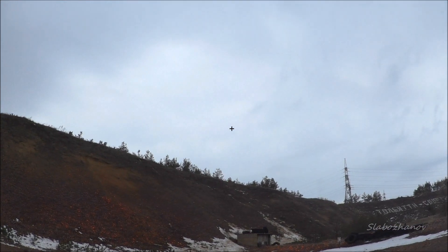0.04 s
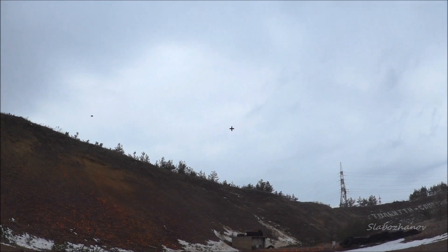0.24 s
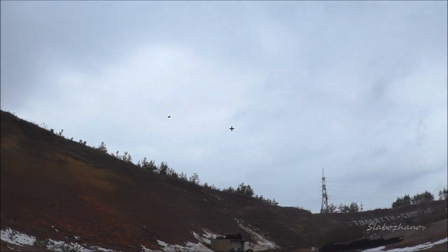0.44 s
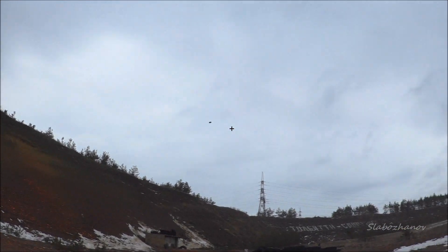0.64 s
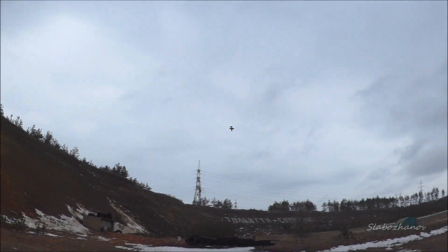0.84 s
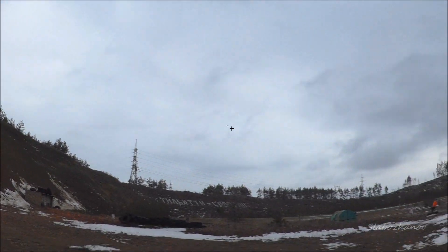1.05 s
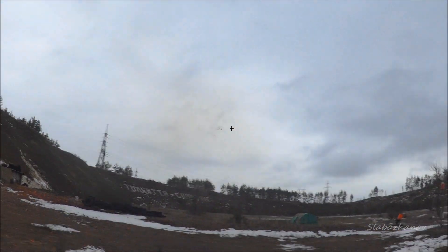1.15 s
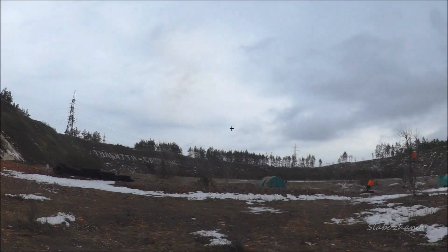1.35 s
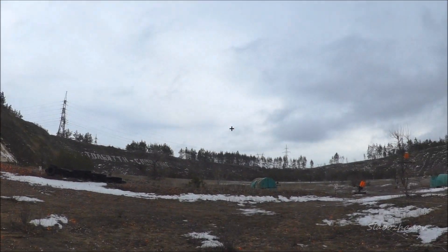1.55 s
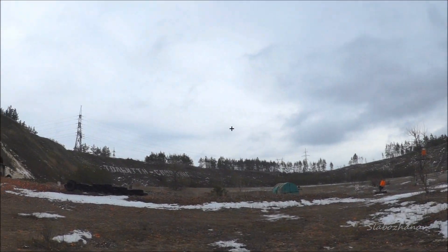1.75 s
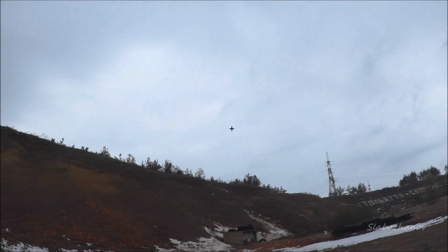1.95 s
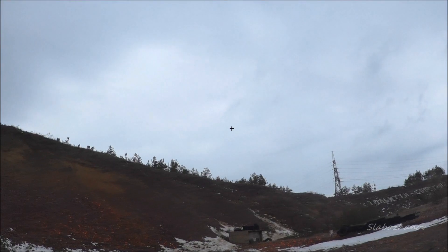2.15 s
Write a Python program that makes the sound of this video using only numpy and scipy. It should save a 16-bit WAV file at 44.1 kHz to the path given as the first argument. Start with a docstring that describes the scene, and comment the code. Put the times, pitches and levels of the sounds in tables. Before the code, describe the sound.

Low gusting wind and case knocks, then a sharp neighbouring gunshot with short rolling echoes; a third of a second later the close shotgun fires, dry and ringing, followed by action clacks, bumps and a sudden stop.

```python
"""A shotgun fires in an open field at clay shooting, heard by a small cased microphone fixed to the gun.
The blast is shaped noise with a bright case rattle; the barrel rings as decaying sines and the action clacks.
Earlier a nearby shot cracks as a pressure pulse and rolls round the slopes as scattered echoes.
Knocks and soft gust puffs excite the case's resonances, and wind noise buffets the case as the gun swings.
Air hiss, rustle and rubs lie beneath; the sound stops dead."""
import sys
import numpy as np
from scipy import signal
from scipy.fft import rfft, irfft
from scipy.io import wavfile
from scipy.ndimage import uniform_filter1d

SR = 44100
rng = np.random.default_rng(int(sys.argv[2]) if len(sys.argv) > 2 else 0)


def master_out(mix):
    """Clip the mix to full scale and print it as 16-bit PCM to the path in sys.argv[1]."""
    frames = np.transpose(np.atleast_2d(mix))
    ceiling = np.clip(frames, -1, 1)
    pcm = np.round(ceiling * 32767).astype(np.int16)
    wavfile.write(sys.argv[1], SR, pcm)


N = 97020
T = np.arange(N) / SR
ATTACK_S = 0.00051  # shared by the sharp sounds

SHOT_S, SHOT_DB, SHOT_HOLD_S, SHOT_T60_S = 1.231, -14.5, 0.02, 0.064
RATTLE_DB, RATTLE_HOLD_S, RATTLE_T60_S = -23, 0.009, 0.06
RATTLE_HITS_PER_S, RATTLE_SPREAD_DB = 11000, 4.5
BLAST_EVEN_S = 0.011
# Tone of the muzzle blast: f/Hz, relative level/dB
BLAST_SPECTRUM = [(60, -11.5), (200, -0.5), (500, 3.5), (900, -5.5), (1900, -7), (2600, -21), (3500, -24),
                  (4100, -54.5), (6000, -49.5)]
# Tone of the rattling case: f/Hz, relative level/dB
RATTLE_SPECTRUM = [(3800, -29), (5800, -25), (6500, -13.5), (7100, -2.5), (7900, -15), (9300, -5),
                   (11000, -21), (12500, -14), (13800, -3), (15500, 1), (16500, -28)]


def own_shot():
    """The blast shakes the case, which rattles as dense bright impacts; the barrel rings on."""
    blast = evened(coloured(BLAST_SPECTRUM), BLAST_EVEN_S)
    blast = from_db(SHOT_DB) * blast * burst(SHOT_S, ATTACK_S, SHOT_HOLD_S, SHOT_T60_S)
    rattle = coloured(RATTLE_SPECTRUM, grains(RATTLE_HITS_PER_S, RATTLE_SPREAD_DB))
    rattle = from_db(RATTLE_DB) * rattle * burst(SHOT_S, ATTACK_S, RATTLE_HOLD_S, RATTLE_T60_S)
    return blast + rattle + barrel()


BARREL_DB, BARREL_DELAY_S = -18, .012
# Limit of the starting sharpness for low modes (share of pitch), and its settling time constant
BARREL_SAG, BARREL_SETTLE_S = 0.09, 0.05
SAG_HALF_HZ = 1300  # a mode this high sags half as much
# Ringing modes of the barrel: settled f/Hz, relative level/dB, t60/s
BARREL_MODES = [(105, 0.5, 0.76), (210, 2.5, 0.14), (358, 5, .17), (462, 3, .08), (585, -1, 0.1),
                (765, -13, 0.14), (3500, -31, 0.13), (3735, -32, 0.27)]


def barrel():
    """The barrel's modes start a little sharp, the low ones most, and settle as they die away."""
    start = SHOT_S + BARREL_DELAY_S
    age = np.maximum(T - start, 0)
    # Extra phase time that the initial sharpness adds up to
    lead = BARREL_SAG * BARREL_SETTLE_S * (1 - np.exp(-age / BARREL_SETTLE_S))
    out = np.zeros(N)
    for hz, db, t60 in BARREL_MODES:
        phase_time = age + lead / (1 + hz / SAG_HALF_HZ)
        mode = np.sin(2 * np.pi * hz * phase_time)
        out += from_db(BARREL_DB + db) * mode * burst(start, ATTACK_S, 0, t60)
    return out


CLACK_HOLD_S, CLACK_T60_S = 0.0034, 0.032
# Steel parts of the action striking: t/s, level/dB
ACTION_CLACKS = [(1.2365, -18.5), (1.2695, -34), (1.3462, -29.5)]
# Tone of the steel: f/Hz, relative level/dB
CLACK_SPECTRUM = [(500, -2), (1150, 11.5), (1900, -0.5), (2400, 6.5), (3500, -4), (4200, -32.5),
                  (5700, -27), (7000, -5), (8500, -18), (12000, -29.5), (15000, -25)]


def action():
    """Short steely noise bursts as the gun's parts hit their stops."""
    hits = sum(from_db(db) * burst(s, ATTACK_S, CLACK_HOLD_S, CLACK_T60_S) for s, db in ACTION_CLACKS)
    return coloured(CLACK_SPECTRUM) * hits


# REPORT_DB is the pulse level before its edge is softened
REPORT_S, REPORT_DB, REPORT_PULSE_S, REPORT_EDGE_HZ = .8760, 2.7, .0007, 1450
BOUNCE_S, BOUNCE_DB = 0.001584, -16  # delay and level relative to the direct pulse
SNAP_DB, SNAP_T60_S = -52, .025
EARLY_DB, EARLY_T60_S = -13, .04
ROLL_DB, ROLL_RISE_S, ROLL_T60_S = -28.3, 0.034, 0.8
FLEX_TOP_HZ, ECHOES_PER_S, ECHO_SPREAD_DB = 2700, 2500, 3
# Flexing modes of the case, before the top is softened: f/Hz, level/dB, t60/s
FLEX_MODES = [(165.7, 1.5, 0.022), (840, -14, 0.018), (2500, -25.5, 0.02)]
# Tone of the echoes off ground and slopes: f/Hz, relative level/dB
ROLL_SPECTRUM = [(80, -5.5), (250, 4), (500, -1), (900, -4), (1500, -16), (2700, -25), (3400, -38),
                 (4200, -62), (6000, -52.5), (7000, -38.5), (8500, -46)]


def nearby_shot():
    """A blast pulse and ground bounce; the case flexes as the bounce lands; ground and slopes echo."""
    age = np.maximum(T - REPORT_S, 0) / REPORT_PULSE_S
    # Pressure jump that decays through zero into suction
    pulse = (T > REPORT_S) * (1 - age) * np.exp(-age)
    pulse = pulse + from_db(BOUNCE_DB) * np.interp(T - BOUNCE_S, T, pulse)
    crack = from_db(REPORT_DB) * low_pass(pulse, REPORT_EDGE_HZ, order=6)

    bounce_hit = click(REPORT_S + BOUNCE_S)
    flex = sum(from_db(db) * ring(bounce_hit, hz, t60) for hz, db, t60 in FLEX_MODES)
    flex = low_pass(flex, FLEX_TOP_HZ, order=8)

    scatter = from_db(EARLY_DB) * burst(REPORT_S, ATTACK_S, 0, EARLY_T60_S)
    roll = from_db(ROLL_DB) * burst(REPORT_S, ROLL_RISE_S, ROLL_RISE_S, ROLL_T60_S)
    echoes = coloured(ROLL_SPECTRUM, grains(ECHOES_PER_S, ECHO_SPREAD_DB))
    snap = from_db(SNAP_DB) * rng.standard_normal(N) * burst(REPORT_S, ATTACK_S, 0, SNAP_T60_S)
    return (scatter + roll) * echoes + flex - crack + snap


# Upper edges of the thud, body and clack mode groups; ticks lie above
THUD_TOP_HZ, BODY_TOP_HZ, CLACK_TOP_HZ = 250, 700, 5047
# Knocks and soft gust puffs on the case, drive per mode group:
# t/s, thud level/dB, body level/dB, clack level/dB, tick level/dB, top of the clack drive f/Hz
KNOCKS_AND_PUFFS = [(.056, -23, -21, -32.5, -58.5, 2500), (.189, -7, -6, -28, -74, 1110),
                    (.279, -11, -14, -23.5, -81.5, 948), (.449, -16, -17, -32, -81, 900),
                    (.982, -13, -19, -28.5, -54, 2500), (1.125, -12.5, -21, -21.5, -56, 2200),
                    (1.16, -19.5, -18, -17, -61, 1240), (1.378, -22, -23, -29, -62.5, 2020),
                    (1.49, -24, -24, -39, -78, 900), (1.524, -22, -20, -31, -74.5, 1036),
                    (1.645, -14, -17, -26, -77, 1114), (1.656, -18, -18, -27.5, -74, 955),
                    (1.714, -25, -28, -22, -66, 1200), (1.774, -22, -22, -31, -54.5, 2500),
                    (1.84, -12.5, -6.5, -12, -47.5, 2000)]
# Light contacts that drive only the tick modes: t/s, drive level/dB
LIGHT_TICKS = [(.503, -60), (.542, -52), (.64, -58), (.673, -54), (1.08, -56)]
# Ringing modes of the case: f/Hz, level relative to the drive/dB, t60/s
CASE_MODES = [(134, -1, 0.044), (331.7, -2.5, 0.024), (537, -6, 0.02), (780, -7, .016), (1150, -7, 0.013),
              (1350, -6.5, 0.02), (1950, -9, 0.012), (2500, -17, 0.022), (3200, -18, 0.017),
              (7050, 0, .008), (8900, -1, .004)]


def knocks_and_puffs():
    """Knocks and soft gust puffs ring the case's modes, from thud to tick; the lightest only tick."""
    drives = np.zeros((4, N))
    for s, thud_db, body_db, clack_db, tick_db, top_hz in KNOCKS_AND_PUFFS:
        push = impact(s)
        drives[0] += from_db(thud_db) * push
        drives[1] += from_db(body_db) * push
        drives[2] += from_db(clack_db) * low_pass(push, top_hz, order=4)
        drives[3] += from_db(tick_db) * push
    drives[3] += sum(from_db(db) * impact(s) for s, db in LIGHT_TICKS)

    groups = np.zeros((4, N))
    for k, (hz, db, t60) in enumerate(CASE_MODES):
        group = np.searchsorted([THUD_TOP_HZ, BODY_TOP_HZ, CLACK_TOP_HZ], hz)
        polarity = (-1) ** k
        groups[group] += polarity * from_db(db) * ring(drives[group], hz, t60)
    thud, body, clack, tick = groups
    return low_pass(thud + body, BODY_TOP_HZ, order=2) + clack + tick


CHATTER_DB, CHATTER_T60_S = -0.5, .05  # chatter energy relative to the first click


def impact(s):
    """One click and the decaying noise chatter that follows it."""
    chatter = rng.standard_normal(N) * burst(s, ATTACK_S, 0, CHATTER_T60_S)
    return click(s) + from_db(CHATTER_DB) * chatter / np.linalg.norm(chatter) + 1e-18


GUST_TEAR, GUST_TEAR_DB = 1.675, -7  # tear grows as this power of the wind gain
BUFFET_LIMIT, BUFFET_TOP_HZ = 0.87, 1280  # limit is an amplitude
EVEN_S, LUMP_DB, LUMPS_PER_S = 0.022, 1.5, 22
# Level of the wind noise as heard, before limiting; it sinks after the gun fires: t/s, level/dB
WIND_LEVEL = [(0, -26.5), (.148, -28), (.175, -8), (.205, -6.5), (.24, -15), (.265, -13), (.36, -18),
              (.46, -17.5), (.53, -28), (.56, -17), (.61, -24), (.8, -37), (.86, -37), (.91, -18.5),
              (.99, -28.5), (1.172, -32), (1.19, -14), (1.22, -11), (1.255, -17), (1.275, -50), (1.47, -32),
              (1.535, -26), (1.56, -35.5), (1.62, -29.5), (1.655, -20), (1.72, -37), (1.76, -23.5),
              (1.865, -23), (1.885, -13), (1.93, -18)]
# Tone of the low buffeting: f/Hz, relative level per Hz/dB
BUFFET_SPECTRUM = [(20, -8), (45, -2), (90, 3.5), (170, -0.5), (260, -5), (400, -19.5), (650, -32.5),
                   (1000, -44.5), (1600, -52)]
# Tone of the brighter tearing: f/Hz, relative level/dB
TEAR_SPECTRUM = [(150, -10), (260, 2), (480, -5), (750, -19.5), (1200, -35)]


def wind():
    """Lumpy buffeting follows the wind level and saturates at its strongest, which tears more brightly."""
    lumps = from_db(LUMP_DB * coloured([(LUMPS_PER_S / 2, 0), (LUMPS_PER_S, 0)]))
    wind_gain = level(WIND_LEVEL)
    buffet = wind_gain * evened(coloured(BUFFET_SPECTRUM), EVEN_S)
    tear = from_db(GUST_TEAR_DB) * wind_gain ** GUST_TEAR * evened(coloured(TEAR_SPECTRUM), EVEN_S)
    limited = BUFFET_LIMIT * np.tanh(lumps * (buffet + tear) / BUFFET_LIMIT)
    return low_pass(limited, BUFFET_TOP_HZ, order=4)


# Jolts of pressure on the microphone: t/s, peak level/dB, width/s
PRESSURE_JOLTS = [(.1838, 1, .0012), (1.2153, -4, .0015), (1.8825, -4, .0024)]


def jolts():
    """Single hard pushes on the case as gusts build: a negative peak with a positive lobe each side."""
    out = np.zeros(N)
    for s, db, width_s in PRESSURE_JOLTS:
        u = (T - s) / width_s
        out -= from_db(db) * (1 - u * u) * np.exp(-u * u / 2)
    return out


RUB_HZ, RUB_T60_S, RUB_WIDTH_S = 1250, .006, .014
# Soft rubs on the case: t/s, level at the top of the swell/dB
CASE_RUBS = [(.665, -51), (.722, -52), (.77, -54), (.845, -50)]


def rubs():
    """Soft rubs swell and fade as noise in one middle resonance of the case."""
    swells = sum(from_db(db) * np.exp(-((T - s) / RUB_WIDTH_S) ** 2) for s, db in CASE_RUBS)
    resonance = ring(rng.standard_normal(N), RUB_HZ, RUB_T60_S)
    return swells * coloured([(RUB_HZ, 0)], resonance)


TICKS_PER_S, TICK_SPREAD_DB = 450, 1.5
# Fine ticking of the mount over time: t/s, level/dB
MOUNT_LEVEL = [(0, -69), (.25, -90), (.6, -68), (.8, -75), (.9, -71), (1.15, -70), (1.6, -87), (1.8, -74),
               (1.93, -73)]
# Tone of the ticking: f/Hz, relative level/dB
MOUNT_SPECTRUM = [(5500, -25), (7000, 3.5), (7800, -4), (9300, -3), (11000, -10), (15000, -3)]


def rustle():
    """Dense tiny ticks as the mount shifts, made from shaped random impulses."""
    return level(MOUNT_LEVEL) * coloured(MOUNT_SPECTRUM, grains(TICKS_PER_S, TICK_SPREAD_DB))


SCUFFS_PER_S, SCUFF_SPREAD_DB, SCUFF_DB = 500, 4.7, -2.5  # SCUFF_DB is relative to the smooth hiss
# Hiss of the open field over time: t/s, level/dB
FIELD_LEVEL = [(0, -52), (.15, -52.5), (.35, -58), (.55, -54), (.8, -55), (1.15, -45.5), (1.29, -51.5),
               (1.4, -49), (1.58, -56), (1.72, -57), (1.8, -47), (1.93, -43)]
# Tone of the field hiss: f/Hz, relative level/dB
FIELD_SPECTRUM = [(200, 0), (350, 7), (600, 7), (1250, 6), (1900, -5), (2800, -10), (3400, -20),
                  (4100, -40), (5900, -38.5), (7000, -27), (12000, -42)]


def air():
    """The noise hiss of the field, roughened by small scuffs on the case."""
    scuffs = coloured(FIELD_SPECTRUM, grains(SCUFFS_PER_S, SCUFF_SPREAD_DB))
    return level(FIELD_LEVEL) * rms_one(coloured(FIELD_SPECTRUM) + from_db(SCUFF_DB) * scuffs)


# Thin high hiss over time: t/s, level/dB
THIN_HISS_LEVEL = [(1.23, -72), (1.3, -90), (1.7, -88), (1.9, -72)]
# Tone of the thin hiss: f/Hz, relative level per Hz/dB
THIN_HISS_SPECTRUM = [(12500, -25), (15200, 0), (16500, -15)]


def hiss():
    """A thin, very high noise drops away after the gun fires and returns near the end."""
    return level(THIN_HISS_LEVEL) * coloured(THIN_HISS_SPECTRUM)


def from_db(db):
    """Decibels to gain."""
    return 10 ** (np.asarray(db) / 20)


def rms_one(x):
    """Scale to unit power."""
    return x / np.sqrt(np.mean(x ** 2) + 1e-20)


def level(rows):
    """Gain along a curve of t/s, level/dB."""
    return from_db(np.interp(T, *np.transpose(rows)))


def coloured(spectrum, source=None):
    """Shape white noise, or a given source, to a spectrum of f/Hz, level/dB; rms 1."""
    if source is None:
        source = rng.standard_normal(N)
    hz, db = np.transpose(spectrum)
    log_f = np.log(np.maximum(np.arange(N // 2 + 1) * SR / N, 1))
    # Beyond the end points the gain falls by 12 dB per octave
    outside = np.maximum(np.log(hz[0]) - log_f, 0) + np.maximum(log_f - np.log(hz[-1]), 0)
    gain = from_db(np.interp(log_f, np.log(hz), db)) * np.exp(-2 * outside)
    return rms_one(irfft(rfft(source) * gain, N))


def evened(x, span_s):
    """Take the slow chance swings out of a noise by dividing by its local rms."""
    size = max(int(span_s * SR), 2)
    power = uniform_filter1d(uniform_filter1d(x * x, size), size)
    return x / np.sqrt(power + 1e-9)


def burst(start, attack, hold, t60):
    """Envelope: linear attack and exponential release; hold counts from the start."""
    age = T - start
    release = from_db(-60 * np.maximum(age - hold, 0) / t60)
    return np.clip(age / attack, 0, 1) * release


def click(s):
    """A unit impulse at time s."""
    return 1. * (np.arange(N) == int(s * SR))


def ring(drive, hz, t60):
    """A decaying resonance: a unit click sets a sine of starting height 1 ringing."""
    r = from_db(-60 / (t60 * SR))  # decay per sample
    w = 2 * np.pi * hz / SR
    return signal.lfilter([0, np.sin(w)], [1, -2 * r * np.cos(w), r * r], drive + 1e-18)


def grains(per_s, spread_db):
    """Random tiny impacts of uneven size and either polarity."""
    sizes = from_db(spread_db * np.minimum(rng.exponential(1, N), 5)) * rng.choice([-1, 1], N)
    return sizes * (rng.random(N) < per_s / SR)


def low_pass(x, hz, order):
    """Soften the treble."""
    return signal.sosfilt(signal.butter(order, hz, fs=SR, output="sos"), x)


BALANCE_DB = 0.14  # first channel over second


def scene():
    """One microphone feeds both channels at slightly different levels."""
    gun = own_shot() + action()
    case = knocks_and_puffs() + rubs() + rustle()
    weather = wind() + jolts() + air() + hiss()
    mono = gun + nearby_shot() + case + weather
    return mono * from_db([[BALANCE_DB / 2], [-BALANCE_DB / 2]])


CEILING, CLIP_KNEE = 1.0, 16  # amplitude; a higher knee bends later and harder
STOP_S, FADE_S, CUTOFF_HZ = 1.934, .001, 17000


def record(dry):
    """The loudest peaks overload; the sound stops dead and the top is cut."""
    clipped = dry / (1 + np.abs(dry / CEILING) ** CLIP_KNEE) ** (1 / CLIP_KNEE)
    gate = np.clip((STOP_S - T) / FADE_S, 0, 1)
    top_cut = signal.cheby2(12, 60, CUTOFF_HZ, fs=SR, output="sos")  # 60 dB down from the cutoff up
    return signal.sosfilt(top_cut, clipped * gate)


dry = scene()
out = record(dry)
master_out(out)
```